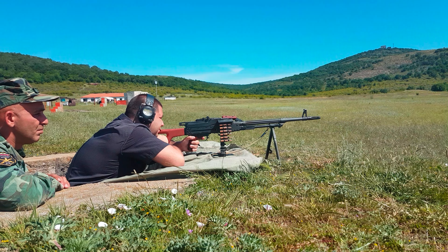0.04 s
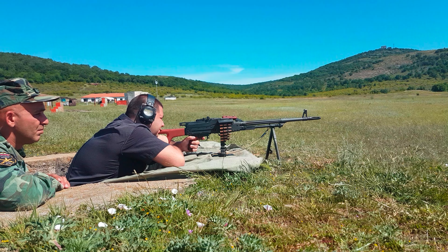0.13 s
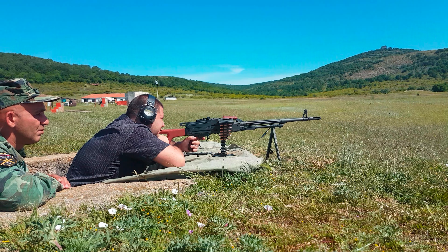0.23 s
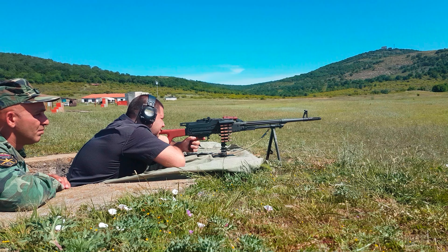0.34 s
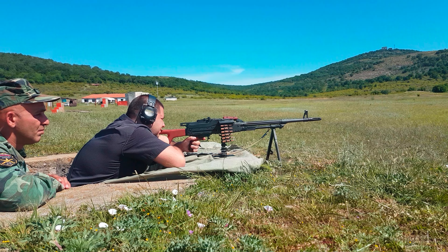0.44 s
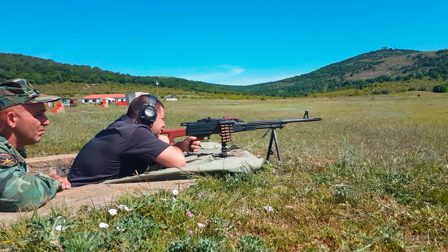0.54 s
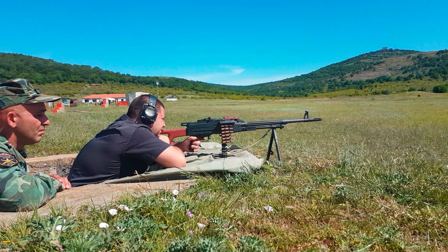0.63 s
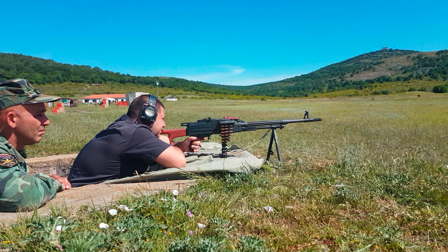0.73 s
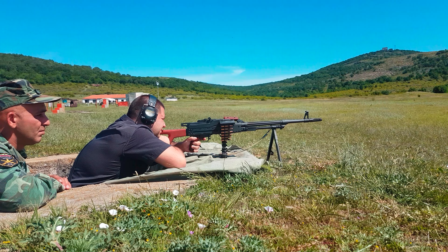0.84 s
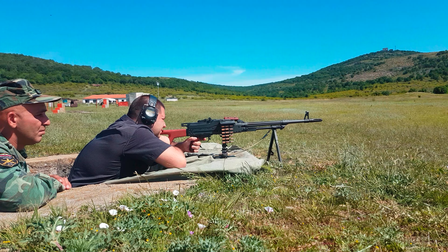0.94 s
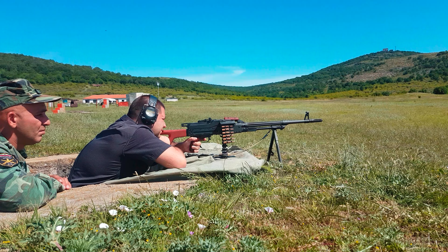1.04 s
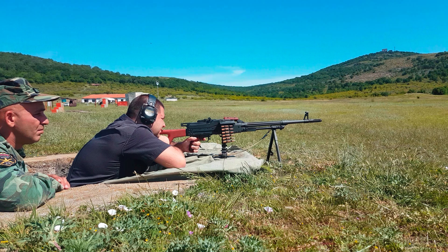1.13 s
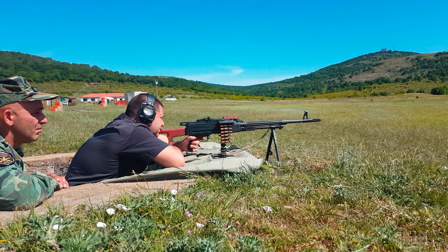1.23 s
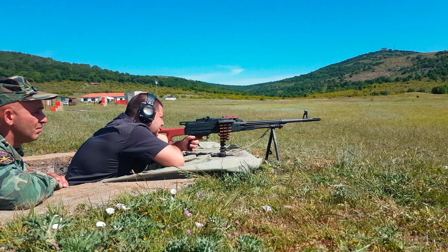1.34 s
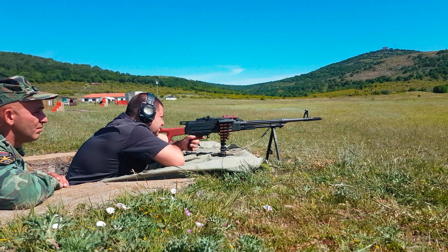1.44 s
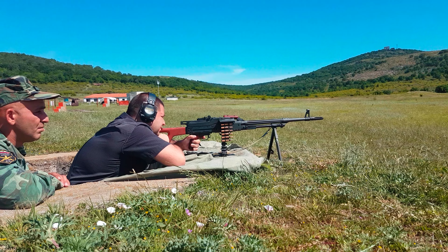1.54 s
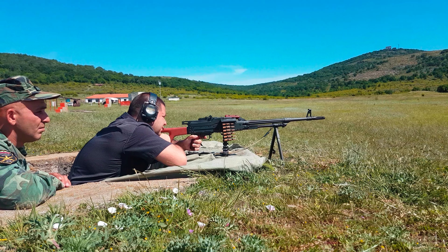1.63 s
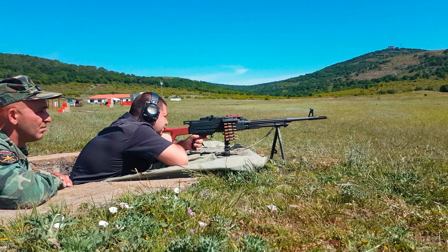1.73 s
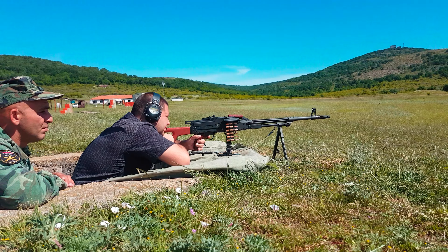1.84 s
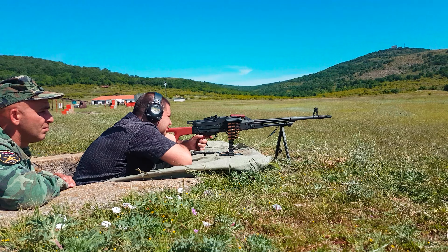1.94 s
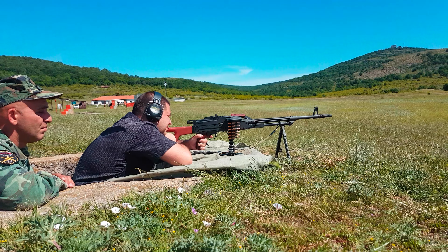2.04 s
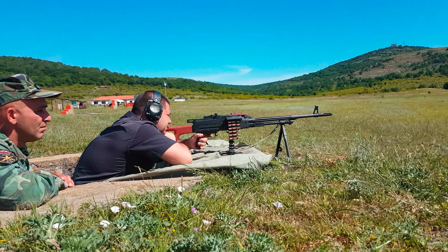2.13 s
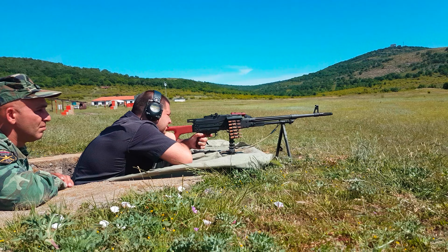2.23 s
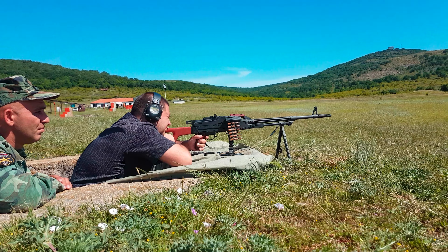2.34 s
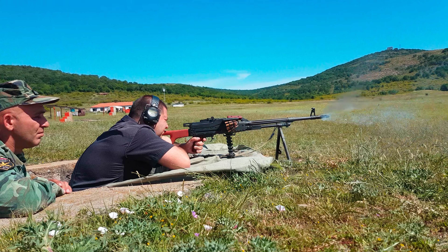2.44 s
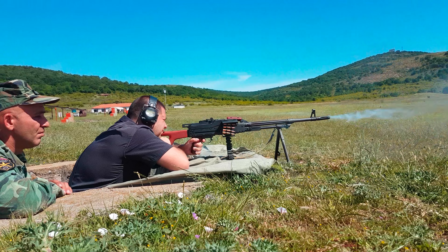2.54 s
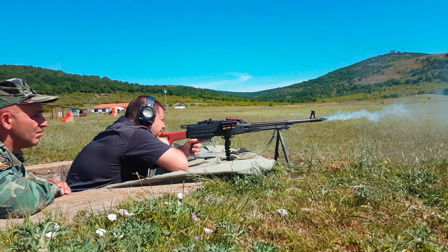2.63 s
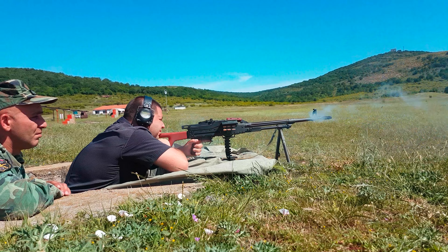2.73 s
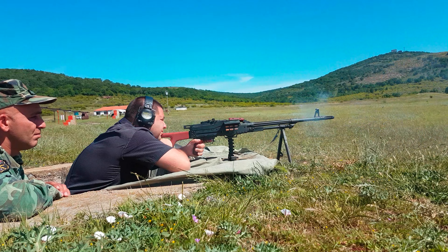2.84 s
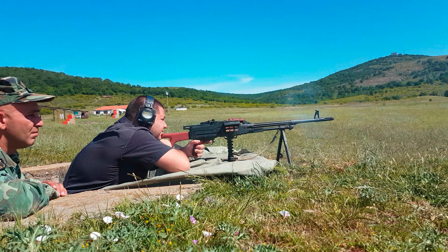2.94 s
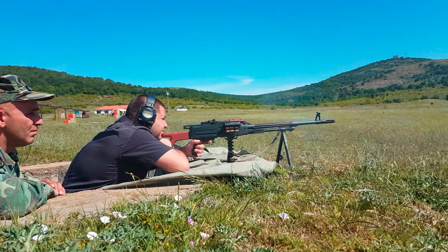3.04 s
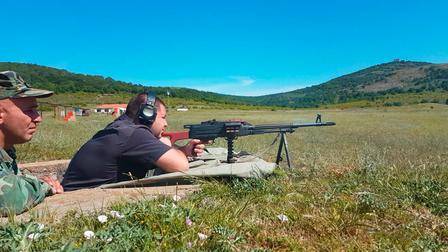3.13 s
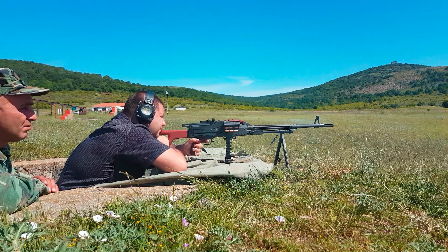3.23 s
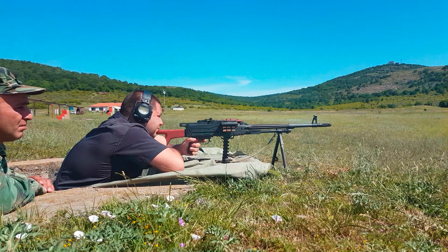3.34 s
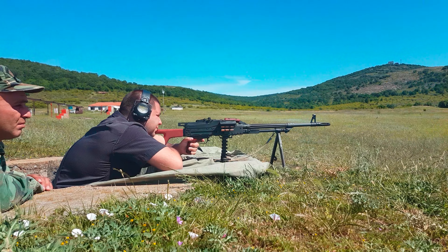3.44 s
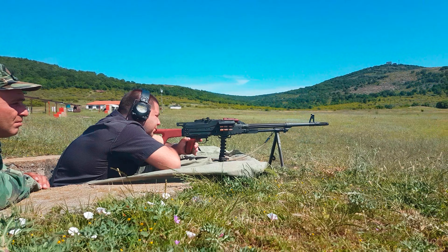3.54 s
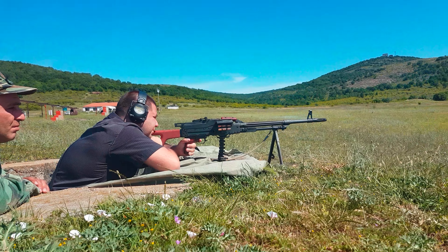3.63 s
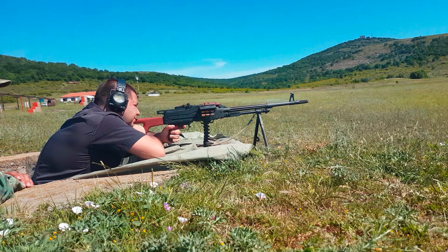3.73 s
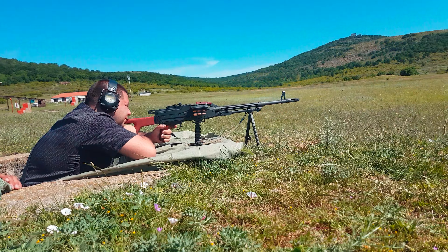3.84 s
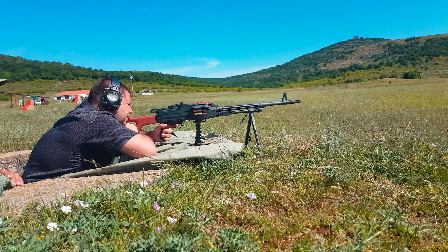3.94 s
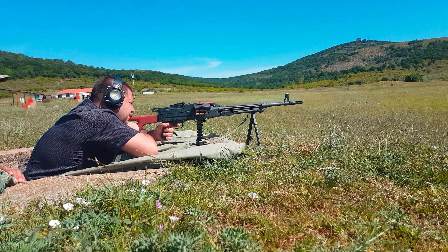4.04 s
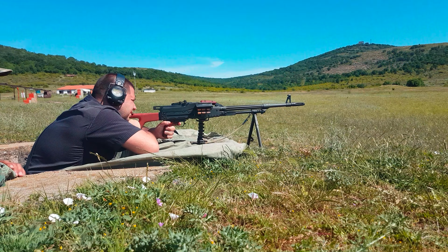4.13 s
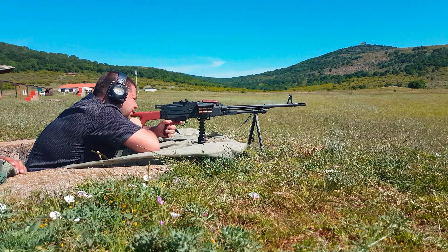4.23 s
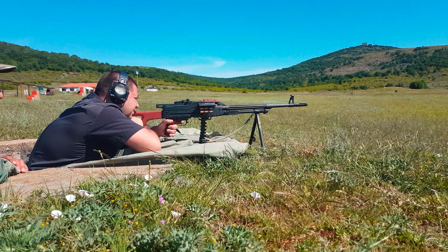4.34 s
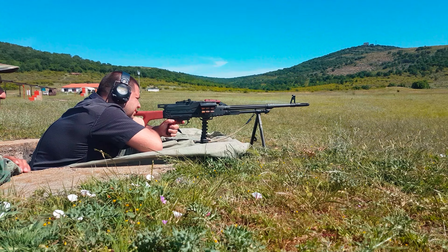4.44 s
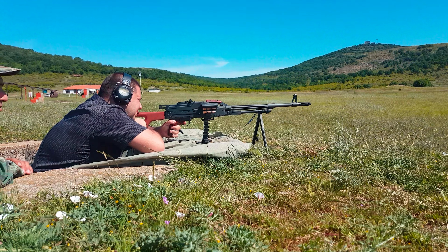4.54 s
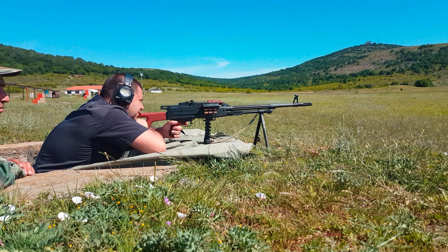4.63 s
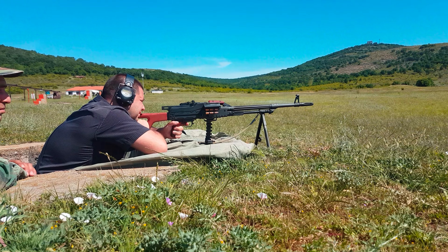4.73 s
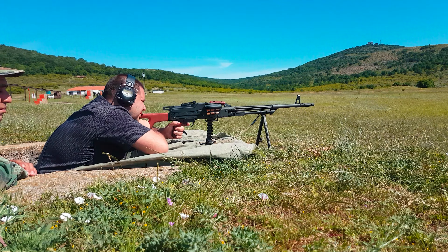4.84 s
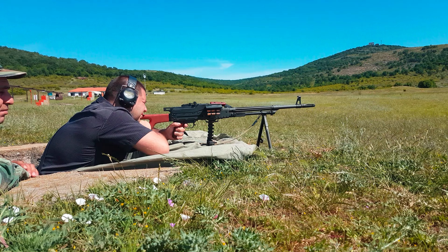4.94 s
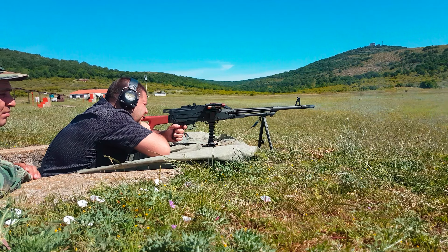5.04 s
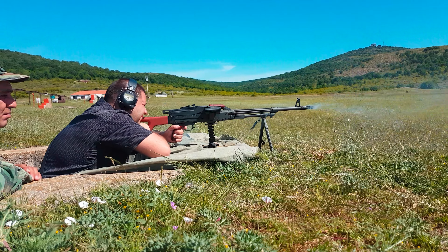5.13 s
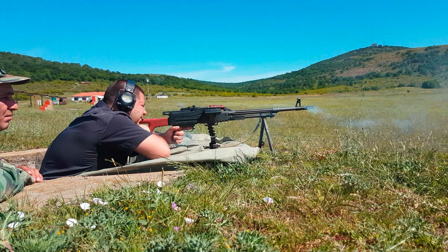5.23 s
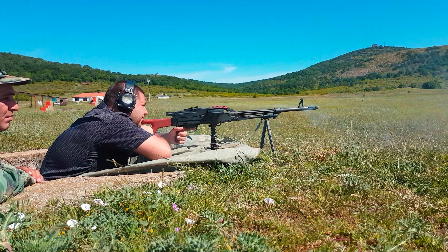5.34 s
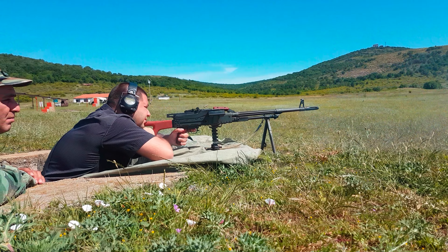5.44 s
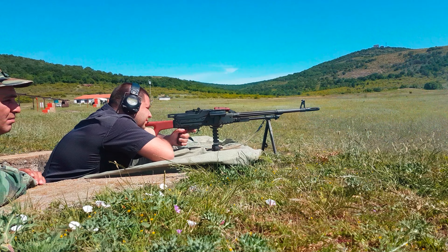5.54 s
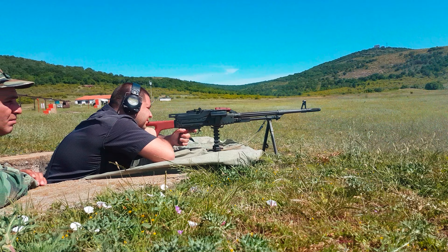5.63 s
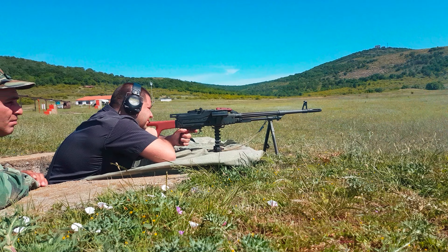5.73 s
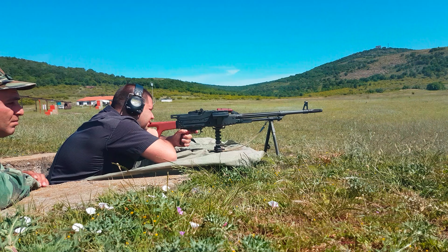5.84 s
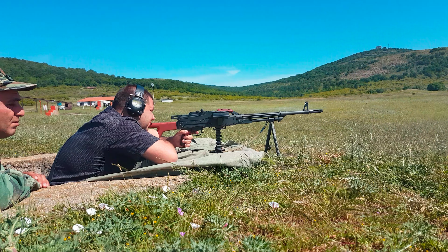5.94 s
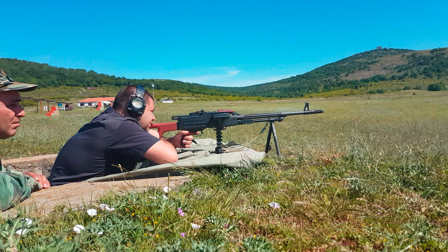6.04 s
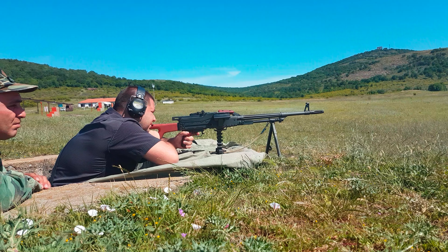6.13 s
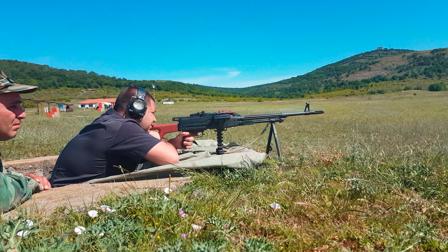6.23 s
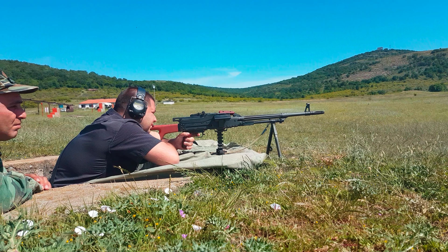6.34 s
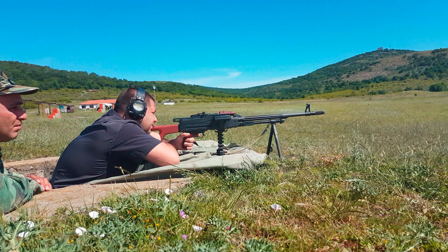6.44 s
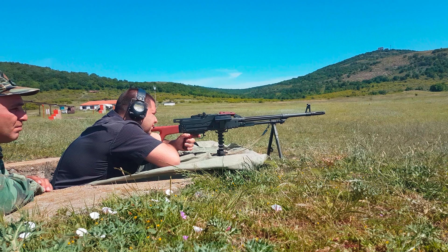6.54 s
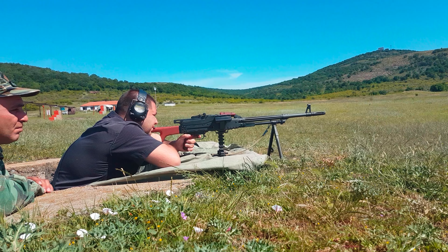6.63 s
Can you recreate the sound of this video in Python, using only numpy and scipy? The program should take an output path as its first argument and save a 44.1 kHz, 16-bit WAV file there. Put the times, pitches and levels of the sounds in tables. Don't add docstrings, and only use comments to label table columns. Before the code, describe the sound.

A belt-fed machine gun close by fires a four-round burst, then a three-round burst, over windy grass with distant rifle pops echoing off hills.

```python
import sys
import numpy as np
from scipy import signal
from scipy.fft import rfft, irfft, next_fast_len
from scipy.io import wavfile
from scipy.ndimage import map_coordinates

SR = 44100
rng = np.random.default_rng(int(sys.argv[2]) if len(sys.argv) > 2 else 0)


def amplitude_ratio(level_db):
    exponent = np.asarray(level_db, float) / 20
    return 10 ** exponent


def persist_wave(psi):
    counts = np.round(np.clip(psi, -1, 1) * 32767).astype(np.int16)
    wavfile.write(sys.argv[1], SR, np.atleast_2d(counts).T)


N = 295029
LEFT_RIGHT = np.array([[.5], [-.5]])


def unit(x):
    return x / np.sqrt(np.mean(x ** 2) + 1e-20)


def along(points, hz):
    f, v = np.transpose(points)
    return np.interp(np.log(hz + 1), np.log(f + 1), v)


def filtered(x, response):
    m = next_fast_len(x.shape[-1] + 8192)
    spectrum = rfft(x, m) * response(np.fft.rfftfreq(m, 1 / SR))
    return irfft(spectrum, m)[..., :x.shape[-1]]


def coloured(x, spectrum):
    return unit(filtered(x, lambda hz: amplitude_ratio(along(spectrum, hz))))


def noise(spectrum, size, alike):
    a, b = rng.standard_normal((2, size))
    turn = np.arccos(np.clip(alike, -1, 1)) / 2
    pair = np.cos(turn) * a + np.sin(turn) * b * np.array([[1], [-1]])
    return coloured(pair, spectrum)


def wobble(rate, size=N):
    knots = rng.standard_normal((2, int(N / SR * 200)))
    places = np.arange(size) * min(rate, 190) / SR
    return np.array([map_coordinates(k, [places]) for k in knots])


def shape(t, rise, hold, t60):
    fall = amplitude_ratio(-60 * np.clip(t - rise - hold, 0, None) / max(t60, 1e-3))
    return np.clip(t / max(rise, 1e-4), 0, 1) * fall


def add(out, s, x):
    part = out[:, round(s * SR):][:, :x.shape[1]]
    part += x[:, :part.shape[1]]


def resonances(modes):
    def mode(f, k, centre, width, db):
        return (-1) ** k * amplitude_ratio(db) * 1j * f * width / (centre * centre - f * f + 1j * f * width)
    return lambda f: sum(mode(f, k, *row) for k, row in enumerate(modes))


def eddies(per_second, life):
    starts = rng.uniform(0.17, 1, (2, N)) * (rng.random((2, N)) < per_second / SR)
    puff = np.exp(-np.arange(SR // 20) / SR / life)
    return signal.fftconvolve(starts, puff[None], axes=1)[:, :N] * rng.standard_normal((2, N))


# time in seconds, strength in dB.
GUSTS = [(0, -50), (.29, -51), (.47, -48), (.77, -48.5), (1.0, -44), (1.29, -37), (1.47, -52.5),
         (1.81, -46), (2.3, -50.5), (3.21, -67), (3.6, -63), (3.84, -54.5), (4.15, -59.5), (4.45, -42),
         (4.8, -50), (5.0, -41.5), (5.7, -68), (6.25, -57)]
# time in seconds, left minus right in dB.
HEADING = [
    (1.3, -17.5),
    (1.55, -6.5),
    (1.9, -14.5),
    (2.8, -4.5),
    (6.0, -3.5),
    (6.4, -12.5),
]
# frequency in Hz, level in dB per Hz.
RUMBLE = [(12, -42.5), (20, -15.5), (64, 2), (120, -1), (330, -10), (535, -21), (600, -26), (780, -48),
          (1320, -120)]
# frequency in Hz, level in dB per Hz.
RUSH = [(150, -6), (350, -4), (700, -3.5), (1100, -7), (1500, -20), (2200, -51.5)]


def buffeting():
    clock = np.arange(N) / SR
    gust_db, lean_db = [np.interp(clock, *np.transpose(rows)) for rows in (GUSTS, HEADING)]
    crackle = amplitude_ratio(-59 + .48 * (gust_db + 52.5) - .42 * (lean_db + 9.5))
    lean = amplitude_ratio(lean_db)
    exposed = np.sqrt(2 / (1 + lean ** 2)) * np.array([lean, np.ones(N)])
    puffs, lumps = eddies(150, life=0.001), amplitude_ratio(2.4 * wobble(16))
    low = unit(lumps * (.7 * noise(RUMBLE, N, 0.11) + .7 * coloured(puffs, RUMBLE)))
    middle = unit(lumps ** 0.73 * coloured(puffs, RUSH) + 0.46 * noise(RUSH, N, 0.18))
    return exposed * (amplitude_ratio(gust_db + 4.0) * low + crackle * amplitude_ratio(-2.5) * middle)


# time in seconds, strength in dB, upper band over lower in dB.
BREEZE = [(0, -48.5, -8), (.33, -55, -12), (1.22, -54, -10), (1.32, -49.5, -5), (1.6, -46.5, -3),
          (1.81, -52, -3), (2.08, -50.5, -3), (2.2, -55.5, -5), (2.85, -51, -3), (3.3, -62, -3),
          (3.75, -46.5, 0), (4.01, -50, 8.5), (4.38, -44, 12), (4.55, -48.5, 12), (5.0, -49, 3.5),
          (5.8, -62.5, 6.5), (6.06, -53.5, 5.5), (6.32, -44, 0)]
# frequency in Hz, level in dB per Hz.
GRASS = [
    [(900, -35), (1300, -12), (1550, -4), (2100, 0), (2500, -5), (2650, -22), (3000, -45)],
    [(1500, -40), (1700, -14), (1900, 0), (2150, -4), (2500, -2.5), (2850, -6), (3150, -22), (3500, -45)],
]


def grass():
    clock = np.arange(N) / SR
    s, breeze_db, upper_db = np.transpose(BREEZE)
    hiss = amplitude_ratio(np.interp(clock, s, breeze_db))
    upper = amplitude_ratio(np.interp(clock, s, upper_db))
    below, above = [unit(amplitude_ratio(1.4 * wobble(15) + 2.6 * wobble(110)) * noise(band, N, 0.2)) for band in GRASS]
    return hiss * amplitude_ratio([[2.5], [.6]]) * (below + upper * above) / np.sqrt(1 + upper ** 2)


# start in seconds, level in dB, hold in seconds,
# low rumble over that level in dB.
WASHES = [(0, -64.5, .01, -11), (1.271, -59.5, 0.426, -4.5), (2.702, -64, 0.133, -3),
          (3.493, -60.5, 0.12, -7), (4.199, -65.5, .03, -14.5), (4.803, -60.5, 0.434, -4.5),
          (5.45, -68, 0.054, -3), (5.856, -70.5, .05, 9), (6.106, -56.5, 0.167, -2),
          (6.377, -63, 0.173, -8)]
# frequency in Hz, level in dB per Hz.
HILL = [(800, -120), (900, -31.5), (1300, 1), (3200, 4), (4500, -4), (5300, -14.5), (6800, -25),
        (7600, -51), (8500, -120)]


def slope_wash():
    clock = np.arange(N) / SR
    wash = np.ones(N) * amplitude_ratio([[-71], [-90]])
    for s, db, hold, low_db in WASHES:
        rise = 0.15 * (s > 0)
        add(wash, s, amplitude_ratio([[db], [db + low_db]]) * shape(clock, rise, hold, t60=1.4))
    slopes = unit(amplitude_ratio(2.4 * wobble(25)[0]) * noise(HILL, N, 0.27))
    return amplitude_ratio(3.5) * (wash[0] * slopes + wash[1] * noise(RUSH, N, 0.34))


def fading_steel():
    t = np.arange(SR // 2) / SR
    out = np.zeros((2, N))
    add(out, 0, amplitude_ratio([[-74], [-74]]) * amplitude_ratio(-60 * t / 0.46) * np.sin(2 * np.pi * STEEL[2][0] * t))
    return out


# time in seconds, peak in dB, frequency in Hz.
THUMPS = [(0.071, -30.5, 228), (0.104, -42, 242), (0.173, -41, 213), (0.198, -36, 170), (0.234, -46.5, 151),
          (0.276, -43, 237), (0.311, -42, 178), (0.365, -35, 253.6), (0.4, -37.5, 151), (0.426, -40.5, 159),
          (0.494, -32, 323.7), (0.521, -35, 224), (0.559, -39, 264), (0.585, -37.5, 150), (0.599, -49, 223),
          (0.618, -41, 261), (0.693, -50, 251), (0.754, -30.5, 156), (0.795, -34, 188), (0.842, -34, 176),
          (0.88, -33.5, 151), (0.911, -30, 304.2), (0.94, -34, 213), (1.007, -37.5, 328),
          (1.033, -32.5, 151), (1.07, -34.5, 241), (1.093, -31.5, 245), (1.121, -30, 152),
          (1.151, -27, 150.5), (1.189, -40.5, 153), (1.215, -34.5, 234), (1.391, -28, 344),
          (1.665, -40, 151), (1.752, -30.5, 166.9), (1.792, -30, 393), (1.852, -28, 345.5),
          (1.889, -36.5, 422.6), (1.913, -34, 277), (1.985, -34, 158.6), (2.204, -45, 237),
          (4.352, -36.5, 161), (4.387, -40, 288), (4.421, -39.5, 175.8), (4.48, -41, 151),
          (4.505, -36.5, 336), (4.521, -35, 233), (4.534, -35, 186), (4.588, -30.5, 152),
          (4.616, -37.5, 151), (4.637, -34.5, 283), (4.69, -30.5, 151), (4.941, -30, 336)]


def thumps():
    out, t = np.zeros((2, N)), np.arange(SR // 16) / SR
    for s, db, hz in THUMPS:
        push = shape(t, .4 / hz, 0.28 / hz, t60=3.4 / hz) * np.sin(2 * np.pi * hz * t / (1 + 25 * t))
        spit_db = -11 + .5 * (-38 - db)
        spit = amplitude_ratio(spit_db) * shape(t, .001, .002, .02) * noise(RUSH, len(t), 0.16)
        lean_db = np.interp(s, *np.transpose(HEADING)) * np.array([[1], [0]])
        add(out, s, amplitude_ratio(db + 3 + lean_db) * (push + spit))
    return out


# time in
# seconds, peak in dB, frequency in Hz.
SNAPS = [(0.3344, -59.5, 6920), (1.4279, -56.5, 5530), (2.0451, -56.5, 13790), (2.965, -43.5, 7510),
         (3.7065, -42.5, 6000), (3.9538, -45, 5526), (4.0293, -40, 8600), (4.147, -40, 13150),
         (4.1825, -54, 13470), (4.2071, -38, 7170), (4.3012, -51, 6500), (4.3488, -39, 6624),
         (4.376, -47.5, 6850), (4.4056, -45.5, 12280), (4.4163, -49, 6570), (4.975, -41.5, 7190),
         (6.2898, -58.5, 5210)]


def snaps():
    out, t = np.zeros((2, N)), np.arange(SR // 40) / SR
    for s, db, hz in SNAPS:
        tick = noise([(.5 * hz, -25), (hz, 0), (1.1 * hz, -8), (15700, -12)], len(t), 0.18)
        add(out, s, amplitude_ratio(db - 2.0) * shape(t, 0.00027, 0.00063, 0.01) * tick)
    return out


# delay in seconds, peak of a burst's last round in dB,
# growth through the burst in dB per second, treble in dB, left minus right in dB.
BANKS = [
    (0.3429, -37, -54.5, -16, 3),
    (0.357, -44, -40, -2, 2.5),
    (0.83, -37.5, 52, -16.5, 2),
]
BANK_T60_S = 0.081


def echoes():
    times = np.array([row[0] for row in ROUNDS])
    rows = []
    for delay, db, growth_db, treble_db, pan_db in BANKS:
        for s in times:
            burst_end = times[times < s + .3].max()
            rows.append((s + delay, db + growth_db * (s - burst_end), treble_db, BANK_T60_S, pan_db))
    return rows


# time in seconds, peak in dB, treble in dB, t60 in seconds, left minus right in dB.
FAR = [(1.244, -8.5, -21.5, 0.052, 6.5), (1.282, -27.5, -21, 0.034, -1.5), (1.306, -25, -28.5, 0.037, -6),
       (1.316, -37.5, -23.5, 0.073, -0.5), (1.454, -38.5, -12.5, 0.043, 2),
       (2.041, -33, -15.5, 0.098, -1.5), (2.81, -28.5, -3.5, 0.066, 5.5), (3.252, -44, -18.5, 0.046, -4.5),
       (3.676, -39.5, -11.5, 0.044, -9.5), (3.761, -37.5, -3, 0.084, -11.5), (4.088, -50, -3, 0.053, 1.5),
       (4.404, -34.5, -7, 0.055, -9), (4.698, -43.5, -20, 0.045, 0.5), (4.795, -14.5, -16.5, 0.046, 5),
       (4.823, -26.5, -42.5, 0.14, -1.5), (4.972, -33.5, -3, 0.0306, 0), (5.879, -30.5, -20.5, 0.104, 2.5),
       (6.055, -40.5, -18, 0.07, -5), (6.151, -22, -18.5, 0.132, 8.5), (6.215, -33, -30.5, 0.07, -2)]
# frequency in Hz, level in dB per Hz.
POP = [(88, -37), (150, -12.5), (481, 2), (634, -5.5), (857, -9), (1280, 2), (1510, -12), (1690, -3.5),
       (1930, -10.5), (2170, -11), (2710, -18), (3000, -18), (3900, -48), (6600, -120)]
# frequency in Hz, width in Hz, level in dB.
VALLEY = [(498, 260, -0.5), (1310, 430, -0.5), (1800, 300, -5.5)]


def far_shots():
    out, t = np.zeros((2, N)), np.arange(SR // 5) / SR
    front = filtered((1 - t / 0.00019) * np.exp(-t / 0.00018), resonances(VALLEY))
    front = front / np.abs(front).max()
    for s, db, treble_db, t60, pan_db in FAR + echoes():
        pop = noise(POP, len(t), 0.28)
        treble = noise([(2500, -40.5), (3200, 1), (6500, -13.0), (8500, -42.0)], len(t), 0.41)
        pop = pop + amplitude_ratio(treble_db) * treble
        body = shape(t, 0.00017, 0.00041, 0.022) + amplitude_ratio(-8.5) * shape(t, 0.0083, 0.0041, 0.9 * t60)
        front_db = 2.0 - 5.5 * (t60 == BANK_T60_S)
        add(out, s, amplitude_ratio(db + pan_db * LEFT_RIGHT) * (amplitude_ratio(-8.0) * body * pop + amplitude_ratio(front_db) * front))
    return out


# frequency in Hz, t60 in seconds.
FIELD = [(100, 0.865), (400, 0.33), (2000, 0.34), (6000, 0.59), (15000, 0.32)]


def field(x):
    hz, t, z = signal.stft(rng.standard_normal((2, SR)), SR, nperseg=256)
    fading = z * amplitude_ratio(-60 * t / along(FIELD, hz)[:, None])
    tail = signal.istft(fading, SR, nperseg=256)[1]
    return signal.fftconvolve(x, tail / np.linalg.norm(tail[0]), axes=1)[:, :N]


def swish(out, colour, t60, s, length, db, tilt_db=0):
    t = np.arange(round(length * SR) + 5000) / SR
    tilted = [(hz, level + tilt_db * np.log2(hz / 2500)) for hz, level in colour]
    add(out, s, amplitude_ratio(db - 54 * t) * shape(t, .004, length, t60) * noise(tilted, len(t), .1))


# start in seconds, length in seconds, level in dB,
# tilt in dB per octave.
ROLLS = [(1.26, 0.084, -52.5, 5.5), (1.515, 0.075, -44.5, -0.5), (1.612, 0.077, -42, -7.5),
         (1.74, 0.202, -53.5, -7), (2.04, 0.0396, -46.5, -8.5), (3.525, 0.065, -50, -1),
         (3.74, 0.11, -44.5, -6), (4.86, 0.114, -57.5, -2), (6.17, 0.127, -55, -2)]


def rolls():
    out = np.zeros((2, N))
    for row in ROLLS:
        swish(out, HILL, .25, *row)
    return out


# time in seconds, level in dB.
BOLT = [
    [(2.37, -36), (2.392, -21), (2.422, -25), (2.428, -23)],
    [(5.002, -28.5), (5.036, -21.5), (5.05, -30), (5.059, -40)],
]
# frequency in Hz, level in dB per Hz.
SCRAPE = [(120, -48), (200, -21.5), (345, -16.5), (525, -1.5), (756, -14), (1950, -10.5), (2430, -7),
          (2810, -21), (3890, -4), (5030, -14), (6980, -11.5), (9340, -24.5), (15600, -17)]
# time
# in seconds, peak in dB, brightness in dB.
KNOCKS = [(2.404, -9.5, 2), (2.428, -3.5, 1.5), (2.51, -7.5, 0.5), (2.597, -5, -3), (2.685, -5, -2),
          (2.769, -3.5, -9.5), (5.033, -10, 0.5), (5.06, -3, 4), (5.142, -7.5, -1), (5.226, -8.5, 2),
          (5.3105, -5, -10.5)]
# frequency in Hz, width in Hz, level in dB.
RECEIVER = [(1170, 260, -6.5), (2460, 160, -1), (4030, 400, -13.5)]


def bolt():
    out, t = np.zeros((2, N)), np.arange(SR // 8) / SR
    for run in BOLT:
        s, db = np.transpose(run)
        clock = np.arange(s[0], s[-1], 1 / SR)
        grain = amplitude_ratio(4.8 * wobble(170, size=len(clock)))
        add(out, s[0], amplitude_ratio(np.interp(clock, s, db) + 2.0) * unit(grain * noise(SCRAPE, len(clock), .05)))
    for s, db, bright_db in KNOCKS:
        blow = noise([(3000, 0), (5000, -12.5), (8000, -39.0)], len(t), 0.11)
        knock = filtered(blow * shape(t, .0003, 0.0011, 0.007), resonances(RECEIVER))
        rasp = shape(t, 0.0018, 0.0093, 0.018) * noise(SCRAPE, len(t), .05)
        add(out, s, amplitude_ratio(db - 3.5) * knock + amplitude_ratio(db + bright_db - 15.5) * rasp)
    return out


# delay in seconds, rise in seconds, hold in seconds, t60 in seconds,
# level in dB, dullness from 0 to 1.
STAGES = [
    (0, .0004, 0.0081, 0.037, -5, 0),
    (.01, .002, 0.01, .07, -8.5, 0.8),
    (0.047, .01, .03, .22, -33.5, .8),
    (.079, 0.0017, 0.0069, 0.024, -32.5, .1),
]
# frequency in Hz, level in dB per Hz.
CRACK = [(180, -37), (300, 0), (1200, 3.5), (2140, 0.5), (3760, -5), (4220, -1), (5580, -7.5), (7520, -7.5),
         (9320, -17), (10300, -12.5), (11200, -8.5), (13200, -5.5), (15600, -8.5)]
# frequency in Hz, level in dB per Hz.
BODY = [(88, -45), (150, -15.5), (274, 2), (472, -3), (845, -8.5), (2230, -7.5), (2510, -11.5),
        (5340, -20.5), (7430, -19.5), (9390, -42), (15600, -28.5)]


def crack(out, s, db, stop, stop_db, grit):
    t = np.arange(SR // 4) / SR
    rear_stop = (stop, 0.00085, .003, .055, stop_db - 7, .45)
    for delay, rise, hold, t60, level, dull in STAGES + [rear_stop]:
        sharp = np.sqrt(1 - dull) * noise(CRACK, len(t), 0.023)
        mix = sharp + np.sqrt(dull) * noise(BODY, len(t), .1)
        rough = amplitude_ratio(2.1 * grit[:, round((s + delay) * SR):][:, :len(t)])
        add(out, s + delay, amplitude_ratio(db + level) * shape(t, rise, hold, t60) * mix * rough)


# delay in seconds, start frequency in Hz, level in dB, t60 in seconds,
# share of pitch lost.
BOOMS = [(0.009904, 385, -4, 0.065, .12), (0.008732, 610, -4, 0.039, 0.13), (0.011, 480, -9, 0.06, 0),
         (0.056, 270, -19, 0.05, .25), (.032, 400, -12, 0.05, .3), (.042, 330, -7.5, 0.035, .4),
         (0.0045, 70, -29, 0.09, .05), (0.018, 150, -23, 0.17, .1), (.075, 270, -22, 0.25, 0.4)]


def boom(out, s, db):
    t = np.arange(SR // 4) / SR
    late = t - np.array([[0], [.00035]])
    sag_s = .02
    for delay, hz, level, t60, sag in BOOMS:
        stretched = (1 - sag) * late + sag * sag_s * (1 - np.exp(-late / sag_s))
        wave = np.sin(2 * np.pi * hz * stretched)
        gain = amplitude_ratio(db + level + rng.normal(0, 0.81))
        add(out, s + delay, gain * shape(t, 0.0023, 2.0 / hz, 0.94 * t60) * wave)


# frequency in Hz, level in dB, t60 in seconds.
STEEL = [(7561, 1, 0.62), (7440, -16, 0.7), (7540, -20, .55), (8366, -15, 0.6), (8885, -6.5, 0.5),
         (9770, -12.5, .09), (15090, -7, .33)]


def steel_ring(out, s, db, upper_db, gap):
    t = np.arange(round(min(gap + .03, 1) * SR)) / SR
    ring = 0
    for k, (hz, level, t60) in enumerate(STEEL):
        extra_db = upper_db * (k > 3)
        free_t60 = t60 * amplitude_ratio(.35 * extra_db)
        tone = np.sin(2 * np.pi * (hz * t + rng.random() + np.array([[0], [.2]])))
        ring = ring + amplitude_ratio(level + extra_db - 60 * t / free_t60) * tone
    flutter = amplitude_ratio((2.2 + 2.5 * (t < .06)) * wobble(90, size=len(t))[0])
    add(out, s + 0.031, amplitude_ratio(db - 22.0) * ring * shape(t, 0.0045, gap, 0.011) * flutter)


# time in seconds, peak in dB, boom over crack in dB, steel ring in dB,
# upper ring in dB.
ROUNDS = [
    (2.4362, -0.5, -1.5, -5.5, -10),
    (2.525, -4.5, -1.5, -7, -7.5),
    (2.611, -6.5, -1.5, -4.5, -5.5),
    (2.696, -5, -1.5, -2, -4.5),
    (5.0683, -0.5, -1, -3, -5),
    (5.1507, -5.5, 0, -0.5, -4),
    (5.237, -6, 0, 4.5, 1),
]
# delay in seconds, level over the usual blow in dB.
STOPS = [(.027, 0), (.0275, 0), (.027, 0), (.0275, 0), (.027, 0), (.029, -1), (.027, 0)]


def gun():
    out = np.zeros((2, N))
    grit = wobble(185)
    gaps = np.diff([row[0] for row in ROUNDS] + [N / SR])
    for (s, db, boom_db, ring_db, upper_db), gap, (stop, stop_db) in zip(ROUNDS, gaps, STOPS):
        crack(out, s, db, stop, stop_db, grit)
        boom(out, s, db + boom_db)
        steel_ring(out, s, db + ring_db, upper_db, gap)
    return out


# time in seconds, level in dB, t60 in seconds, pitch factor.
JINGLE = [
    (2.76, -45, 2.18, 0.991),
    (5.301, -44, 1.6, 1.235),
]
# frequency in Hz, level in dB per Hz.
BELT = [(1200, -44.5), (1800, -8), (2250, 3.5), (2800, -9), (3500, -10), (3900, -20), (4300, -6),
        (4700, -7), (5100, -15), (6500, -16), (7100, -43), (8000, -120)]
# time in seconds, peak in dB, frequency in Hz.
CASES = [(2.8314, -27.5, 2262), (2.9984, -43.5, 2171), (3.0754, -40, 1995), (3.1381, -38.5, 2143),
         (3.1615, -41.5, 2242), (3.1887, -42, 2240), (3.2226, -38, 2040), (5.3314, -39.5, 2720),
         (5.3484, -30, 1810), (5.3622, -21, 1770), (5.3794, -34, 2670), (5.3944, -30.5, 1910),
         (5.5388, -47, 2743), (5.5973, -39.5, 2670), (5.6211, -37.5, 2146), (5.6795, -36.5, 2150),
         (5.702, -45, 2877), (5.7278, -42.5, 2250), (5.7607, -41, 2120), (5.7858, -52.5, 1995)]


def leftovers():
    out, t = np.zeros((2, N)), np.arange(SR) / SR
    for s, db, t60, pitch in JINGLE:
        swing = amplitude_ratio(4.72 * wobble(60.36, size=SR))
        links = noise(np.multiply(BELT, [pitch, 1]), SR, 0.153)
        add(out, s, amplitude_ratio(db) * shape(t, 0.023, 0.0185, t60) * unit(swing * links))
    t = t[:SR // 20]
    for s, db, hz in CASES:
        colour = [(0.58 * hz, -35), (.87 * hz, -10), (hz, 0), (1.2 * hz, -8), (1.5 * hz, -26), (3 * hz, -50)]
        clink = noise(colour, len(t), .3)
        add(out, s, amplitude_ratio([[db - 5], [db - 8]]) * shape(t, 0.0008, 0.002, 0.025) * clink)
    return out


# start in seconds, length in seconds, level in dB.
BRUSHES = [(3.25, 0.032, -70.5), (3.335, 0.082, -67), (3.525, 0.069, -56.5), (3.614, .065, -65),
           (3.74, 0.062, -55.5), (3.792, 0.089, -61.5), (4.342, 0.044, -66.5), (4.404, 0.02, -61.5)]
# frequency in Hz, level in dB per Hz.
RUSTLE = [(4000, -15), (6500, -3.5), (9000, -6.5), (13000, 1.5), (15700, -4.5)]


def brushes():
    out = np.zeros((2, N))
    for row in BRUSHES:
        swish(out, RUSTLE, .02, *row)
    return out


# frequency in Hz, left minus right in dB.
LEAN = [(60, -2), (180, 1), (400, 0), (1650, 1.5), (4970, 4.5), (9000, -2.5), (15000, -2)]
# frequency in Hz, width in Hz, level in dB.
FRAME = [(1210, 170, -4), (1560, 80, -9), (1880, 70, -5), (2240, 90, -4), (2590, 110, -8), (4100, 200, -7)]


def scene():
    def gun_at_ports(hz):
        return amplitude_ratio(along(LEAN, hz) * LEFT_RIGHT - 0.8) * (1 + abs(resonances(FRAME)(hz)))

    near = filtered(gun() + bolt(), gun_at_ports)
    far = far_shots() + fading_steel()
    scattered = field(amplitude_ratio(-11.5) * near + amplitude_ratio(-9.0) * far)
    debris = leftovers() + snaps() + brushes() + rolls()
    wind = buffeting() + grass() + slope_wash() + thumps()
    return near + far + scattered + debris + wind


def roll_off(x):
    return signal.sosfilt(signal.butter(12, 15700, fs=SR, output="sos"), x)


# goes down at seconds, lets go at seconds, depth in dB.
DUCKS = [
    (2.7, 3.3, -10.5),
    (5.302, 6.1, -13.5),
    (6.15, 6.7, -5),
]
# frequency in Hz, level in dB per Hz.
AMPLIFIER = [(3000, -12), (5000, 1), (7000, -3), (9500, -10.5), (13000, -2.5), (15700, -4)]


def record(dry):
    clock, fall_s, recover_s = np.arange(N) / SR, .25, .35
    duck_db = sum(np.interp(clock, [down, down + fall_s, up, up + recover_s], [0, db, db, 0])
                  for down, up, db in DUCKS)
    hiss = amplitude_ratio(-76.5 + duck_db + 5.0) * noise(AMPLIFIER, N, 0)
    clipped = np.clip(dry + hiss, -.97, .97)
    mix = filtered(clipped, lambda hz: (hz < 15710) * hz ** 2 / (hz ** 2 + 33 ** 2))
    return roll_off(mix)


dry = scene()
out = record(dry)
persist_wave(out)
```